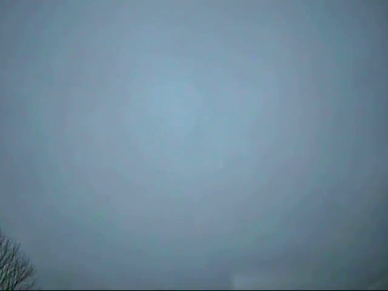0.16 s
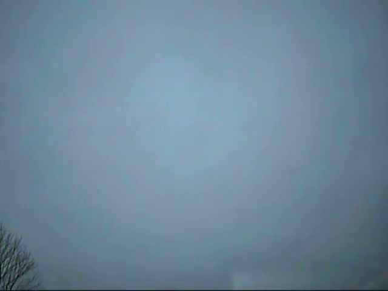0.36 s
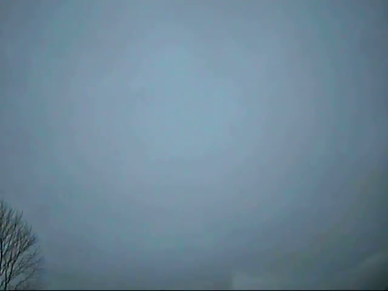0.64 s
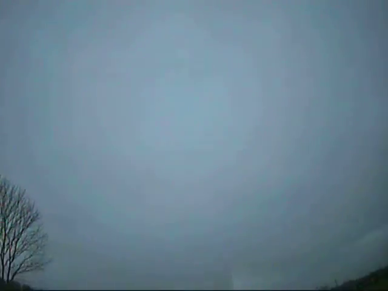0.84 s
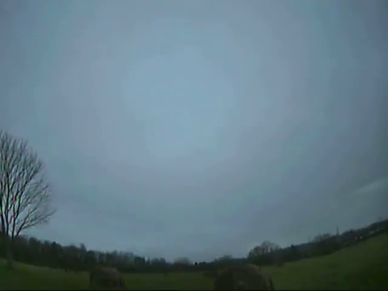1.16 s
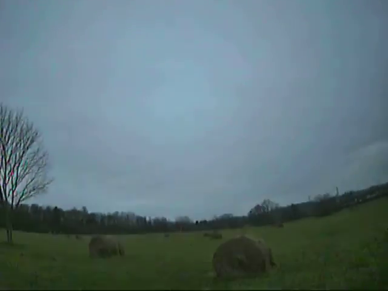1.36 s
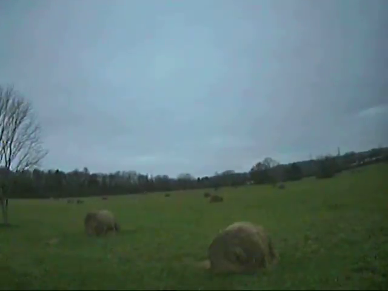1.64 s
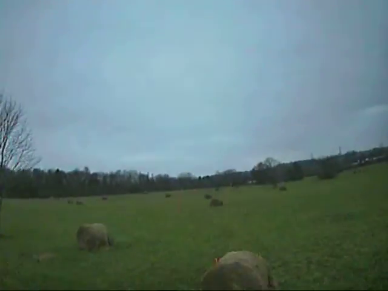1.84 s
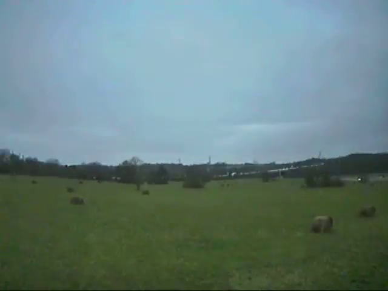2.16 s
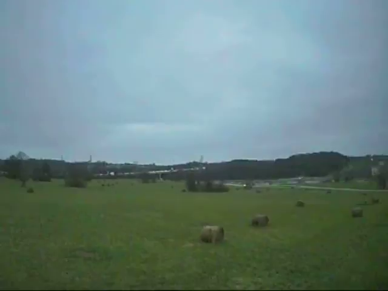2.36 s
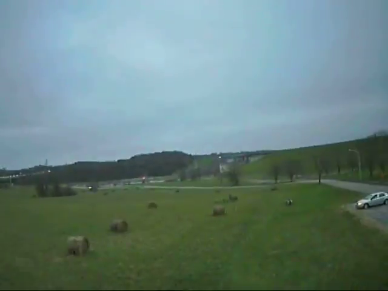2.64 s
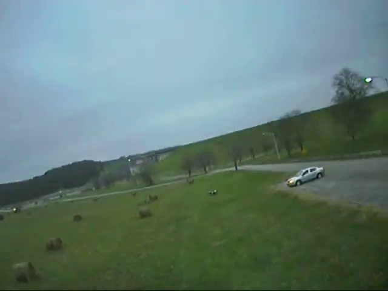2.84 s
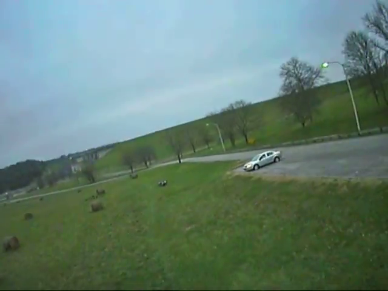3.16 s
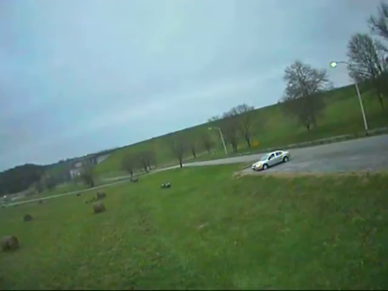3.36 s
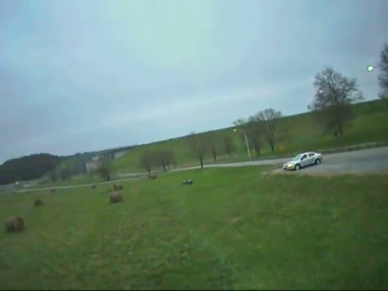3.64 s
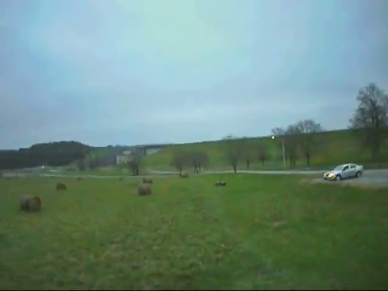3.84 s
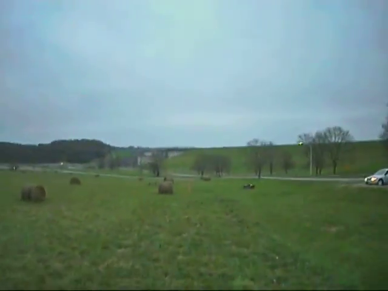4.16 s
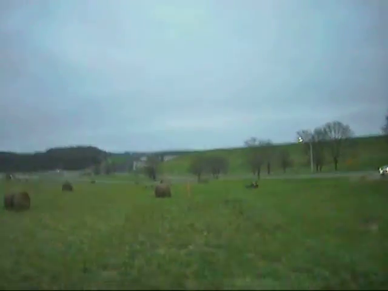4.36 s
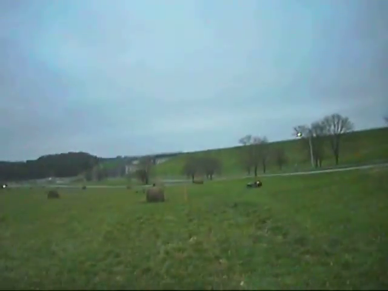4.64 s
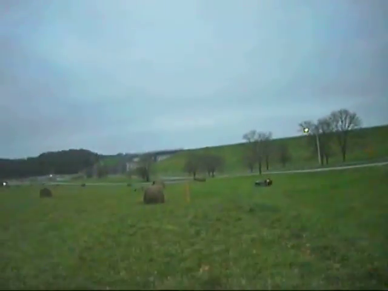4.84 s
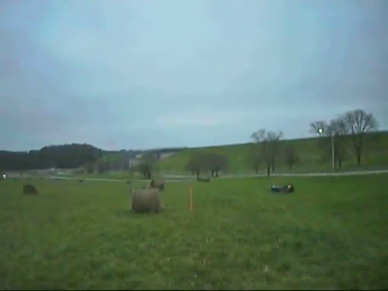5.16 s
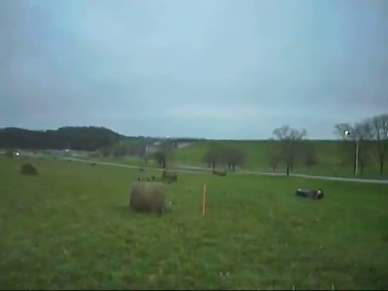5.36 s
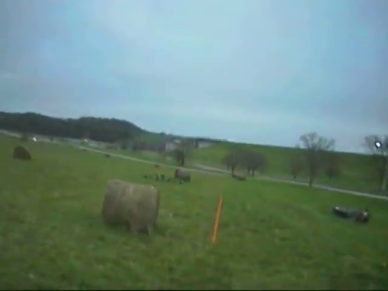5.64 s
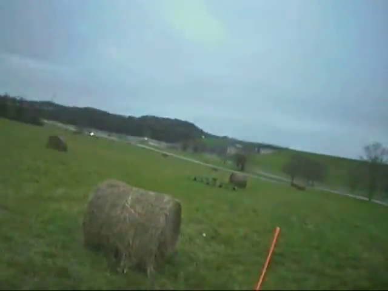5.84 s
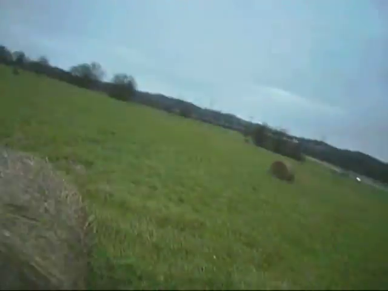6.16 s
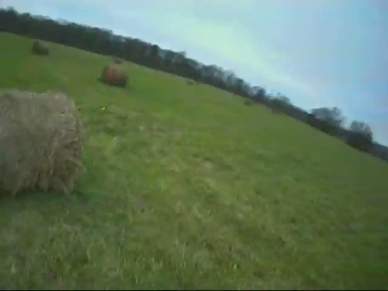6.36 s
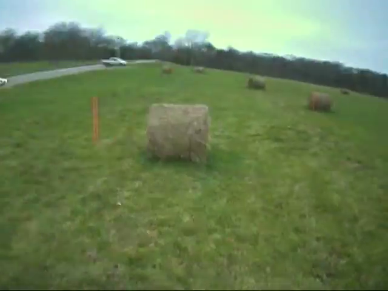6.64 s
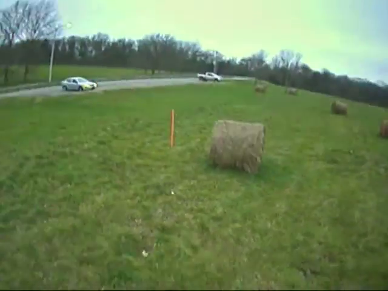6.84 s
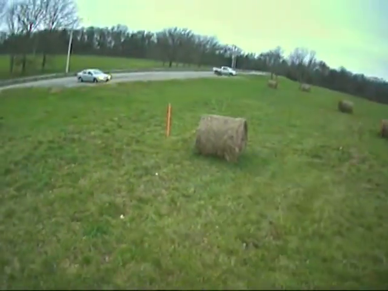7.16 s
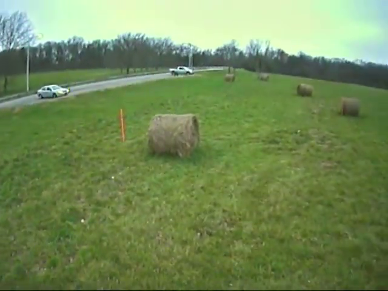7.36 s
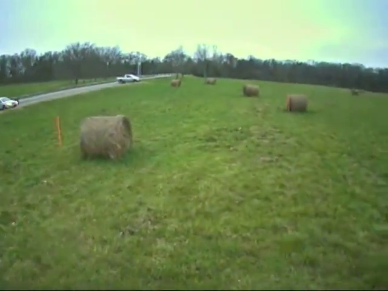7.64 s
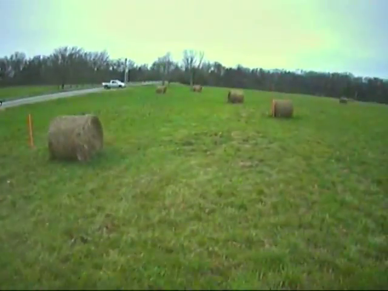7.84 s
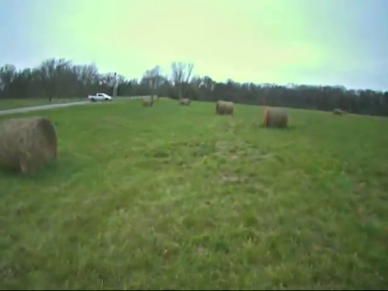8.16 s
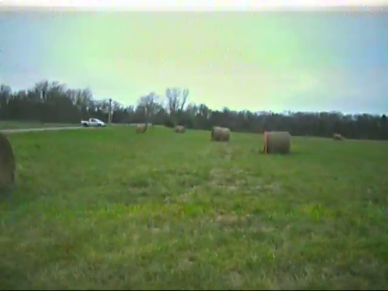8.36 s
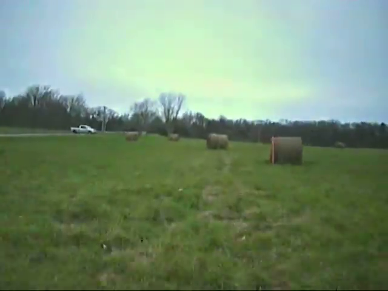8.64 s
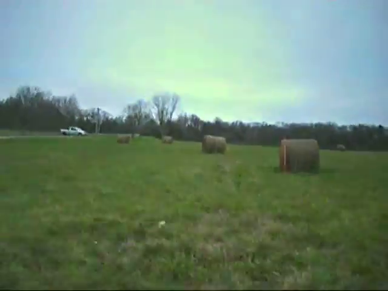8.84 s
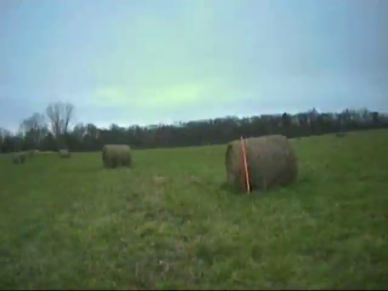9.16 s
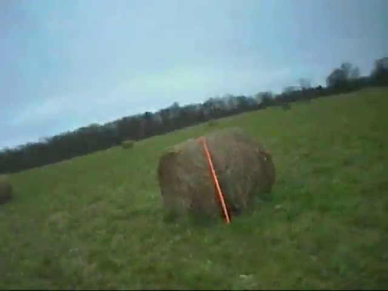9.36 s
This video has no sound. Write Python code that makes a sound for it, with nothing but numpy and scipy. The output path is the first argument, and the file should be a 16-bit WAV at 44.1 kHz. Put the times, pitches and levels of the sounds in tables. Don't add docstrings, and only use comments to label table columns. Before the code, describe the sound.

The microphone sits on a small drone, so everything is close, mono, muffled and gritty, with constant faint 50-cycle video buzz and hiss. For the first 0.7 s the propellers idle low, quiet and unsteady. They spin up sharply to a buzzing nasal whine by 1.3 s, hold, then drop from 1.8 s as a thin metallic ring sounds near 2 s. A low growl sags until about 3 s amid fluttering air. The pitch climbs again from 3.1 s to a steady whine near 4.5 s, with wind swelling and a tiny click at 4.7 s. It dips at 5.2 s, then rises to a strained peak around 6 s. Through the hard turn, 6.1-7.3 s, detuned propellers beat and heavy gusts thump and overload while pitch falls. It rebounds from 7.5 s, peaks highest near 8.8 s, then eases down after 9.3 s with more buffeting.

```python
import sys
import numpy as np
from scipy import signal
from scipy.io import wavfile
from scipy.ndimage import uniform_filter1d

SR = 44100
rng = np.random.default_rng(int(sys.argv[2]) if len(sys.argv) > 2 else 0)


def transcribe(signal):
    frames = np.atleast_2d(signal).T
    limited = np.clip(frames, -1, 1)
    pcm = np.round(limited * 32767).astype(np.int16)
    wavfile.write(sys.argv[1], SR, pcm)


def boost(x):
    u = np.asarray(x, float) / 20
    return 10 ** u


N = 418950
CRUISE_HZ = 360


def rms_one(x):
    return x / np.sqrt(np.mean(x ** 2) + 1e-20)


def in_time(rows):
    s, *columns = np.transpose(rows)
    return [np.interp(np.arange(N) / SR, s, c) for c in columns]


def faded(rows, fade_s):
    first, last = rows[0], rows[-1]
    return in_time([(first[0] - fade_s, first[1], -80), *rows, (last[0] + fade_s, last[1], -80)])


def drift(rate_hz):
    pole = np.exp(-80 * np.pi * rate_hz / SR)
    noise = rng.standard_normal(N // 40 + 2002)
    slow = signal.lfilter([1], [1, -2 * pole, pole * pole], noise)[2000:]
    return np.interp(np.arange(N) / 40, np.arange(len(slow)), rms_one(slow))


def turning(blade_hz, wobble):
    return np.pi * np.cumsum(blade_hz * (1 + wobble * drift(27.42))) / SR


def blade_speed():
    idle_hz, inertia_s = 130.1, .04
    # start t/s, length/s, new blade-pass f/Hz
    throttle = [(.26, .11, 158.7), (.73, .24, 309.9), (.96, .38, 377), (1.45, .3, 365.8), (1.76, .13, 338),
                (1.891, 0.13, 235), (2.05, 0.16, 276), (2.281, 0.17, 212), (2.759, 0.15, 168),
                (3.099, 0.28, 292.7), (3.42, .23, 281.6), (3.65, 0.18, 317.1), (3.809, 0.36, 352),
                (4.2, .77, 363.8), (5.11, .22, 304.6), (5.489, .16, 367.6), (5.679, 0.089, 391.4),
                (5.867, .13, 416), (6.009, .15, 395), (6.251, .15, 349.7), (6.43, .13, 361.7),
                (6.621, .14, 342.3), (6.899, .2, 240.4), (7.2, 0.23, 205.4), (7.479, 0.22, 330),
                (7.718, 0.26, 362.7), (8.149, 0.24, 412), (8.678, 0.15, 429.6), (8.84, .15, 406),
                (9.266, 0.24, 326.4)]
    t = np.arange(N) / SR
    hz = before_hz = idle_hz
    for s, length, new_hz in throttle:
        hz = hz + (new_hz - before_hz) * np.clip((t - s) / length, 0, 1)
        before_hz = new_hz
    return uniform_filter1d(hz, int(inertia_s * SR) + 1)


def blade_levels(hz):
    # start t/s, length/s, tone level/dB, overtone level/dB, shake/dB
    manoeuvres = [
        (.02, 0.67, -1, -3.5, 5),
        (2.47, 0.62, -1.5, -2.5, 0.9),
        (6.097, .22, 2.5, -2, -0.2),
        (6.359, 0.29, 6, -11.5, 0),
        (6.75, 0.76, 0, -7, 3.5),
    ]
    edge_s = 0.037
    t, octaves, shake = np.arange(N) / SR, np.log2(hz / CRUISE_HZ), drift(8.3)
    lag_db = -0.5 * np.maximum(np.gradient(octaves) * SR, 0)
    tone_db = -14.5 + 11.5 * octaves + lag_db
    bright_db = 1 - octaves - lag_db
    for s, length, load_db, dull_db, shake_db in manoeuvres:
        on = np.clip(np.minimum(t - s, s + length - t) / edge_s + .5, 0, 1)
        tone_db = tone_db + on * (load_db + shake_db * shake)
        bright_db = bright_db + on * dull_db
    return tone_db, bright_db


def propeller(turn, tone_db, overtone_db, uneven_db, flutter_db, crowd=1):
    # multiple of shaft speed, level/dB
    shaft_orders = [(1, -11), (2, 0), (3, -20.5), (4, -8), (5, -16.5), (6, -12.5), (7, -21.5), (8, -19.5),
                    (9, -29.5), (10, -25.5), (11, -32.5), (12, -32), (13, -29), (14, -34), (15, -30),
                    (16, -33)]
    out = 0
    for order, db in shaft_orders:
        level_db = tone_db + db + overtone_db * (order > 2) + uneven_db * (order % 2)
        level_db = level_db + flutter_db * drift(14)
        bend = crowd if order > 2 else 1
        wave = np.exp(1j * (order * turn + rng.uniform(0, 2 * np.pi)))
        out = out + boost(level_db) * np.real(bend * wave)
    return np.sqrt(2) * out


def rotors(near_hz):
    # t/s, speed share of the nearest, level under the nearest/dB
    slow_trim = [(0, .93, -16), (1.101, .91, -16.5), (1.449, .92, -11.5), (1.85, 0.99, -21),
                 (3.3, .86, -11.5), (3.461, .86, -5), (3.699, .85, -5), (3.901, .93, -10),
                 (4.749, .93, -12), (5.3, .94, -20), (7.5, .87, -22), (7.699, .925, -7),
                 (7.879, .915, -6.5), (8.049, .86, -6.5), (8.501, .86, -19), (9.0, .86, -19), (9.5, .9, -6)]
    # t/s, speed share of the nearest, level under the nearest/dB
    fast_trim = [(0, 1.28, -21), (.9, 1.08, -12), (1.8, 1.04, -18.5), (2.029, 1.15, -4.5),
                 (2.2, 1.22, -5.5), (2.4, 1.214, -17.5), (4.2, 1.02, -10.5), (4.751, 1.093, -8.5),
                 (5.401, 1.06, -24.5), (7.602, 1.06, -3), (8.2, 1.085, -35), (9.5, 1.04, -7)]
    # t/s, blade-pass f/Hz, blade tone level/dB
    inner = [(5.95, 277.9, -23.5), (6.062, 240.3, -27), (6.09, 247.4, -13.5), (6.18, 257, -14.5),
             (6.266, 242, -10), (6.468, 262.6, -13.5), (6.5, 286.7, -15.5), (6.7, 313.6, -16),
             (7.05, 219.4, -17)]
    near_db, bright_db = blade_levels(near_hz)
    near_turn, crowd, out = turning(near_hz, wobble=.0055), 1, 0
    for trim in slow_trim, fast_trim:
        share, under_db = in_time(trim)
        turn = turning(near_hz * share, wobble=0.0048)
        out = out + propeller(turn, near_db + under_db, bright_db - 2.5, uneven_db=-5.0, flutter_db=1.5)
        crowd = crowd + .6 * np.minimum(boost(under_db), 1) * np.exp(2j * (turn - near_turn))
    out = out + propeller(near_turn, near_db, bright_db, uneven_db=-3.5, flutter_db=1.49, crowd=crowd)
    inner_hz, inner_db = faded(inner, 0.079)
    inner_turn = turning(inner_hz, wobble=.004)
    out = out + propeller(inner_turn, inner_db + 3.5, -11, uneven_db=-3, flutter_db=1.2)
    frame_hz, frame_width_hz, frame_db = 2026, 160, -0.5
    b, a = signal.iirpeak(frame_hz, frame_hz / frame_width_hz, fs=SR)
    return out + boost(frame_db) * signal.lfilter(b, a, out)


def banded_noise(spectrum, patchy_db, rate_hz):
    out, together = 0, drift(rate_hz)
    edges_hz = 14 * 2 ** np.arange(0, 8.6, .5)
    white = rng.standard_normal((2, N))
    hz, db = np.transpose(spectrum)
    for k, (low, high) in enumerate(zip(edges_hz, edges_hz[1:])):
        band_filter = signal.butter(2, [low, high], "band", fs=SR, output="sos")
        band = signal.sosfilt(band_filter, white[k % 2])
        level_db = np.interp(np.log(low * high) / 2, np.log(hz), db, left=-60, right=-60)
        flicker_db = patchy_db * (.6 * together + .8 * drift(rate_hz))
        out = out + band * boost(level_db + flicker_db)
    return rms_one(out)


def air(near_hz):
    # f/Hz, density level/dB per Hz
    buffet_spectrum = [(15, 0), (40, 1.5), (80, -2), (140, -3), (250, -7.5), (500, -18), (900, -42.5)]
    # f/Hz, density level/dB per Hz
    wash_spectrum = [(120, -16.5), (250, 5.5), (500, 3), (900, 4.5), (1500, -9), (2500, -24)]
    # f/Hz, density level/dB per Hz
    hiss_spectrum = [(700, -7), (1400, 1), (2100, 0), (2700, -8.5), (3400, -7.5), (4300, -12)]
    # t/s, airflow level/dB, tip load/dB
    airflow = [(0, -34.5, 1.2), (.75, -35, .1), (.95, -33.5, 4), (1.2, -27.5, 0.7), (1.9, -28.5, -0.5),
               (2.25, -21.5, -3), (2.65, -28.5, -2.4), (3.1, -33, .1), (3.6, -26.5, -0.2), (4.2, -17.5, -2),
               (4.65, -13.5, 0.5), (5.25, -20, 4.5), (6.0, -15.5, 0.5), (6.5, -20, 0.7),
               (7.05, -14.5, -0.5), (7.4, -29, 1.5), (8.15, -26.5, 1), (8.5, -17.5, 0.25)]
    # middle t/s, half width/s, strength level/dB, sharpness/dB
    gusts = [(.36, .05, -29.5, -13), (.9, 0.12, -22, -22), (1.66, 0.071, -25, 4), (2.25, 0.08, -22.5, 1.5),
             (2.41, 0.045, -16.5, 2), (2.71, 0.033, -22, -9), (3.001, 0.11, -21.5, -15),
             (3.27, 0.098, -13, -8.5), (3.45, 0.11, -17, -4.5), (3.82, 0.17, -14.5, -8.5),
             (4.09, .05, -17, -4.5), (4.35, .05, -19, 0), (4.6, 0.089, -19.5, 4), (4.76, 0.03, -26, 3.5),
             (5.77, .05, -24, -2), (6.03, 0.068, -20, 8.5), (6.311, .06, -9.5, 0),
             (6.501, 0.098, -14.5, -4), (6.7, 0.097, -7.5, -2.5), (6.87, 0.069, -9, -4),
             (7.02, .07, -7.5, -7), (7.139, 0.062, -12, -10.5), (7.31, .06, -11.5, -10),
             (7.53, .06, -18, -4.5), (8.44, 0.071, -13.5, -2.5), (9.05, 0.11, -12, 1), (9.3, 0.09, -16, 3),
             (9.421, 0.044, -20.5, 5.5)]
    t, (flow_db, tip_db) = np.arange(N) / SR, in_time(airflow)
    swing_db = flow_db - flow_db.mean()
    low = boost(-27.5 + 0.35 * swing_db) ** 2
    mid = boost(flow_db) ** 2
    for s, width, db, sharp_db in gusts:
        power = boost(2 * db) * np.exp(-((t - s) / width) ** 2)
        low = low + power
        mid = mid + power * boost(2 * sharp_db)
    hiss_db = -28.5 + tip_db + 0.41 * swing_db + 4 * np.log2(near_hz / CRUISE_HZ)
    buffet = boost(1.5) * np.sqrt(low) * banded_noise(buffet_spectrum, patchy_db=2.0, rate_hz=4.7)
    wash = boost(-2.5) * np.sqrt(mid) * banded_noise(wash_spectrum, patchy_db=1.5, rate_hz=11)
    hiss = boost(hiss_db) * banded_noise(hiss_spectrum, patchy_db=0.97, rate_hz=10)
    return buffet + wash + hiss


def video_link():
    field_hz, blank_s, whistle_hz = 49.99, .0015, 3930
    t = np.arange(N) / SR
    blank = ((t * field_hz - .58) % 1 < blank_s * field_hz) * 1.
    buzz = boost(-36) * rms_one(blank - blank.mean())
    swell = np.cos(np.pi * (t * field_hz - .9)) ** 12
    hiss = boost(-38.5) * rng.standard_normal(N) * (1 + 1.9 * swell)
    whistle = boost(-49) * np.sin(2 * np.pi * whistle_hz * t + 0.5 * drift(3.0))
    return buzz + hiss + whistle


def whines(near_hz):
    # start t/s, length/s, multiple of blade-pass, level/dB
    magnets = [(0.786, 0.31, 10.0, -45), (.86, 0.17, 7.0, -39.5), (2.4, .32, 13.3, -49),
               (3.4, .42, 9.7, -48.5), (3.34, 0.77, 6.6, -42)]
    # t/s, f/Hz, level/dB
    arm = [(1.93, 2285, -44), (1.97, 2160, -36), (2.03, 2144, -35), (2.1, 2280, -37.5), (2.3, 2065, -38)]
    t = np.arange(N) / SR
    lines = []
    for s, length, multiple, db in magnets:
        outside_s = np.maximum(s - t, t - s - length)
        lines.append((multiple * near_hz, db - 40 * np.clip(outside_s / 0.068, 0, 1)))
    lines.append(faded(arm, 0.054))
    out = 0
    for hz, db in lines:
        level = boost(db + 3 + 3.4 * drift(25))
        out = out + level * np.sin(2 * turning(hz, wobble=0.0089))
    return out


def scene():
    near_hz = blade_speed()
    return (rotors(near_hz) + whines(near_hz) + air(near_hz) + video_link())[None]


def low_pass(x):
    return signal.sosfilt(signal.butter(12, 15850, fs=SR, output="sos"), x)


def record(dry):
    store_hz, glitch_s, glitch_step = 8000, 4.6931, -.33
    t = np.arange(N) / SR
    top = np.where(dry > 0, .6, 1.05)
    x = dry / (1 + (dry / top) ** 4.) ** .25
    x = signal.lfilter([1, -1], [1, -np.exp(-2 * np.pi * 26 / SR)], x) - .021
    x = signal.sosfilt(signal.ellip(6, .3, 60, 4100, fs=SR, output="sos"), x)
    x = np.clip(x, -.685, .7)
    x = x * (1 + 2 * np.cos(2 * np.pi * store_hz * t))
    x = signal.sosfilt(signal.cheby2(16, 98, 4960, fs=SR, output="sos"), x)
    since = t - glitch_s
    x = x + glitch_step * (since >= 0) * np.exp(-np.abs(since) / .0002)
    return low_pass(np.clip(x, -.695, .705))


dry = scene()
out = record(dry)
transcribe(out)
```